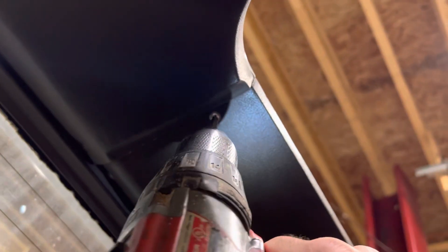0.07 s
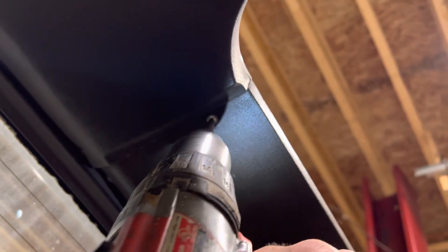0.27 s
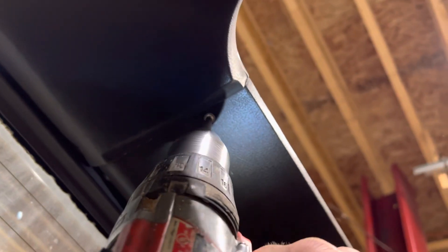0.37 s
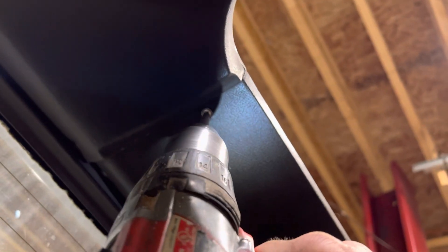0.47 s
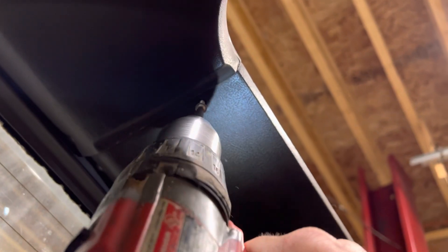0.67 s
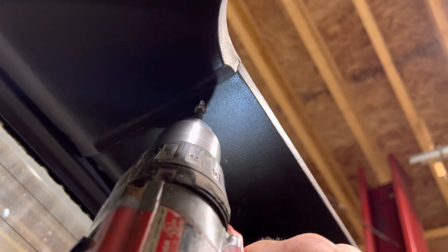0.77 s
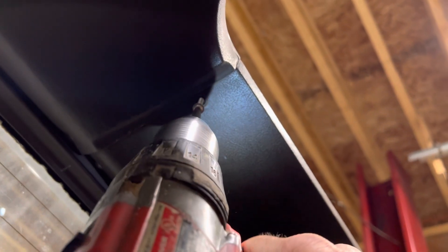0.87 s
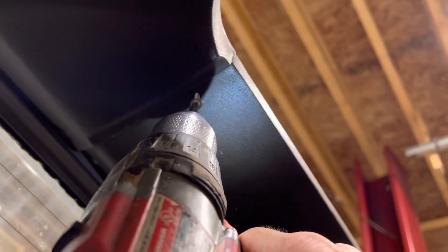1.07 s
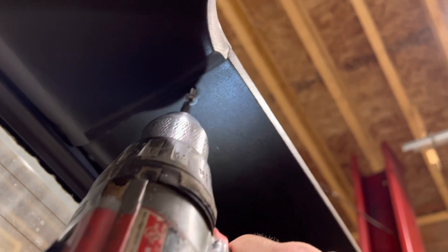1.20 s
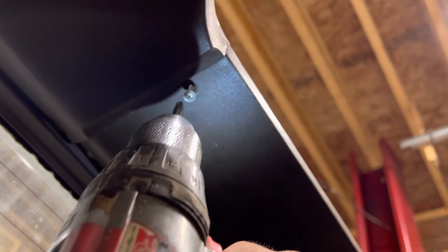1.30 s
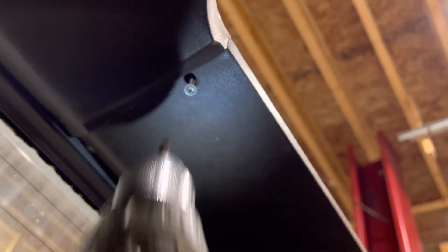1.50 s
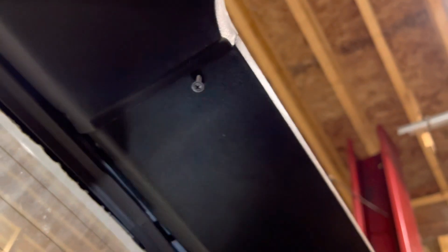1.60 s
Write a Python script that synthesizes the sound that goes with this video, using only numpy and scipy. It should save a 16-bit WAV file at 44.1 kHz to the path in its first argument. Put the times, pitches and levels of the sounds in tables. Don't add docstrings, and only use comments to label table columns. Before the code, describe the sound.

A cordless drill clicks, whines and rattles for under a second, backing a screw from metal

```python
import sys
import numpy as np
from scipy import signal
from scipy.fft import rfft, irfft
from scipy.io import wavfile
from scipy.ndimage import uniform_filter1d

SR = 44100
rng = np.random.default_rng(int(sys.argv[2]) if len(sys.argv) > 2 else 0)


def pcm_store(signal):
    levels = np.round(np.clip(np.atleast_2d(signal), -1, 1) * 32767)
    wavfile.write(sys.argv[1], SR, levels.astype(np.int16).T)


def voltage_ratio(decibels):
    exponent = np.asarray(decibels, float) / 20
    return 10 ** exponent


N = 72765
START_S, BRAKE_S, STOP_S = .193, .895, .929


def curve(table, x, col=1, log=False):
    points = np.array(table, float)
    if log:
        return np.interp(np.log(x + 1), np.log(points[:, 0] + 1), points[:, col])
    return np.interp(x, points[:, 0], points[:, col])


def unit(x):
    return x / np.sqrt(np.mean(x ** 2))


def colour(x, table):
    hz = np.fft.rfftfreq(N, 1 / SR)
    return irfft(rfft(x) * voltage_ratio(curve(table, hz, log=True)), N)


def walk(rate):
    hold = int(SR / rate)
    steps = np.repeat(rng.standard_normal(N // hold + 1), hold)
    return unit(uniform_filter1d(uniform_filter1d(steps, hold), hold)[:N])


def ring(x, modes):
    out = 0
    for hz, db, t60 in modes:
        radius = np.exp(-np.log(1000) / (t60 * SR))
        angle = 2 * np.pi * hz / SR
        poles = [1, -2 * radius * np.cos(angle), radius * radius]
        out = out + voltage_ratio(db) * np.sqrt(1 - radius) * signal.lfilter([np.sin(angle)], poles, x)
    return out


def gate(t, on, rise, off, fall):
    return np.clip((t - on) / rise, 0, 1) * np.exp(-np.maximum(t - off, 0) / fall)


# (frequency [Hz], level [dB per Hz])
AIR_TONE = [(25, -24.5), (60, 1), (110, -15), (300, -25), (1500, -29.5), (2600, -49), (5000, -55),
            (12000, -74.5)]


def air(t):
    mid = unit(colour(rng.standard_normal(N), AIR_TONE))
    side = unit(colour(rng.standard_normal(N), AIR_TONE))
    side = signal.lfilter(*signal.butter(1, 400, "high", fs=SR), side)
    level_db = -55 + 5 * (t < STOP_S) + 0.95 * walk(8)
    return voltage_ratio(level_db) * (mid + .8 * side * np.array([[1], [-1]]))


# (time [s], level [dB])
RUMBLE_LEVEL = [(0, -30.5), (.19, -34), (.25, -34), (.4, -18.5), (.67, -26.5), (.72, -32), (.8, -37),
                (1.0, -39), (1.12, -58)]
# (frequency [Hz], level [dB per Hz])
RUMBLE_TONE = [(28, -28), (50, -2.5), (66, 11.5), (100, -13), (200, -13), (350, -21.5), (800, -41),
               (2000, -95.5)]


def rumble(t):
    noise = unit(colour(rng.standard_normal(N), RUMBLE_TONE))
    level_db = curve(RUMBLE_LEVEL, t) - 3 + 1.5 * walk(20)
    return voltage_ratio(level_db) * noise * gate(t, 0, .012, 9, 1)


# (frequency [Hz], level [dB], t60 [s])
METAL = [(715, -8, .05), (1640, -8, .025), (2750, -5, .02), (4420, -7, .03), (5100, -8, .02),
         (5550, -7, .02), (5970, -7, .06), (6150, -5, .1), (6600, -7, .025), (6950, -7, .03),
         (8070, -10, .02), (8590, -9, .03)]
# (time [s], level [dB], centre frequency [Hz], length [s], metal ring level [dB])
KNOCKS = [(0.131, -46, 3000, 0.0077, -25), (0.145, -29.5, 5992, 0.0055, -44.5),
          (0.195, -21, 5500, .004, -43), (0.199, -15, 2800, 0.0045, -22), (0.207, -17, 930, 0.0044, -2.5),
          (0.211, -18, 2770, 0.019, 2.5), (0.206, -25, 329, 0.021, -9.5), (.243, -26.5, 2440, 0.024, 5),
          (.297, -18, 1310, 0.011, -20), (0.898, -17, 1007, 0.011, -1), (0.902, -18.5, 2760, 0.0031, -10),
          (0.913, -16.5, 2280, 0.0032, -9), (0.917, -9.5, 6110, 0.0017, 2),
          (0.922, -21.5, 2500, 0.0023, -4), (0.931, -29.5, 2920, 0.0013, -8.5),
          (0.94, -29.5, 721, 0.0038, -10.5), (.950, -40.5, 1500, .004, -11.5),
          (.965, -57.5, 8000, 0.0037, -14), (0.973, -30.5, 6610, 0.004, -33),
          (1.4705, -44.5, 7800, 0.0029, -30), (1.471, -58, 1503, 0.00375, -32),
          (.922, -21.5, 370, .01, -20)]


def knocks(t):
    contact_noise, push_noise = rng.standard_normal((2, N))
    spread = 1.8
    blows, push = 0, 0
    for start, db, hz, length, ring_db in KNOCKS:
        band = signal.butter(1, [hz / spread, min(hz * spread, .45 * SR)], "band", fs=SR)
        blow = voltage_ratio(db) * gate(t, start, .0004, start + .0004, length)
        blows = blows + blow * unit(signal.lfilter(*band, contact_noise))
        push = push + voltage_ratio(ring_db) * blow * unit(signal.lfilter(*band, push_noise))
    return blows + ring(push, METAL)


# (frequency [Hz], level [dB per Hz])
RATTLE_TONE = [(300, -5.5), (1000, -12.5), (2100, -18.5), (3000, -6.5), (6000, 2.5), (9000, -2.5),
               (11000, -12), (16000, -20)]
# (time [s], gear mesh frequency [Hz], rattle level [dB], load on the teeth [dB])
MOTOR = [
    (0.2, 418.5, -30, -1.5),
    (0.226, 473, -21, 0.5),
    (0.246, 550.2, -16.5, -3),
    (0.306, 664.6, -20, 1.5),
    (0.484, 765.7, -20, 0.5),
    (0.56, 865, -17, 0),
    (0.616, 887.7, -18, 1.5),
    (0.8, 943.2, -19.5, 1),
    (0.895, 848.5, -22.5, -5),
]


def rattle(t):
    planet_db = np.sin(2 * np.pi * 88.4 * t)
    force = voltage_ratio(walk(900) + planet_db + 1.1 * walk(25))
    hits = rng.standard_normal(N) * force
    impacts = unit(colour(hits, RATTLE_TONE)) + voltage_ratio(-13.5) * unit(ring(hits, METAL))
    running = gate(t, START_S, .007, STOP_S, 0.0047) * voltage_ratio(-4 * (t > BRAKE_S))
    return voltage_ratio(curve(MOTOR, t, col=2)) * running * impacts


# (multiple of mesh frequency, level [dB], flutter [dB])
MESH = [(1, -32, 2), (2, -49, 5), (3, -40, 3), (4, -30, 2)]
# (frequency [Hz], width [Hz], gain [dB])
HOUSING = [(555, 200, -11.5), (998, 400, 5.5), (1560, 620, 6), (2800, 380, 12.5), (3650, 450, 3.5)]


def whine(t):
    mesh_hz = uniform_filter1d(curve(MOTOR, t), size=2600)
    phase = 2 * np.pi * np.cumsum(mesh_hz * (1 + .002 * walk(80))) / SR
    load_db = curve(MOTOR, t, col=3)
    out = 0
    for k, db, flutter_db in MESH:
        lift_db = sum(gain / (1 + (2 * (k * mesh_hz - hz) / width) ** 2) for hz, width, gain in HOUSING)
        level = voltage_ratio(db + load_db + lift_db + flutter_db * walk(40))
        out = out + level * np.sqrt(2) * np.sin(k * phase)
    return out * gate(t, START_S, 0.096, BRAKE_S, 0.0024)


# (frequency [Hz], level [dB], t60 [s])
PANEL = [(135, -4.5, .1), (187.4, -1.5, .08), (349, -7, .1), (458.9, -5, .12), (726, -3, .25)]


def shaken_panel(t):
    free_s = .68
    modes = unit(ring(rng.standard_normal(N), PANEL))
    swell_db = 3.5 * np.exp(-((t - free_s) / 0.09) ** 2)
    return voltage_ratio(-28.5 + swell_db) * modes * gate(t, START_S, .02, free_s, .12) * (t < STOP_S)


# (time [s], level [dB], starting frequency [Hz])
JOLTS = [
    (0.229, -20, 220),
    (.284, -12.5, 340),
    (0.303, -8, 340),
    (.316, -5, 216.7),
    (0.346, -10.5, 79.55),
    (.745, -19, 233.6),
    (.765, -14, 126.3),
]


def booms(t):
    end_hz, fall_s, decay_s = 47, .024, .045
    out = 0
    for start, db, top_hz in JOLTS:
        since = np.maximum(t - start, 0)
        cycles = end_hz * since + (top_hz - end_hz) * fall_s * (1 - np.exp(-since / fall_s))
        out = out + voltage_ratio(db) * gate(t, start, .004, start + .004, decay_s) * np.sin(2 * np.pi * cycles)
    return out


def lamp(t):
    return voltage_ratio(-86.5 + 3.5 * walk(15.96)) * np.sin(2 * np.pi * 5370 * t) * gate(t, 1.45, 0.031, 9, 1)


def room(x, t):
    t60_s, treble_t60_s = .6, .28
    sides = []
    for _ in range(2):
        noise = rng.standard_normal(N)
        low = signal.lfilter(*signal.butter(1, 1500, fs=SR), noise)
        tail = low * voltage_ratio(-60 * t / t60_s) + (noise - low) * voltage_ratio(-60 * t / treble_t60_s)
        echo = tail * (t > .006) / np.sqrt(np.sum(tail ** 2))
        sides.append(signal.fftconvolve(x, echo[:SR])[:N])
    return voltage_ratio(-25) * np.array(sides)


# (frequency [Hz], left minus right [dB])
LEFT_OVER_RIGHT = [(60, 1.0), (110, 1.5), (200, 2.5), (380, 2.0), (700, 3.5), (1290, 7.0), (2380, 2.5),
                   (4400, 8.5), (8120, 6.0), (15000, 0.0)]
# (frequency [Hz], side minus mid [dB])
SIDE_OVER_MID = [(60, -15), (110, -12), (200, -7), (380, -8), (700, -6), (1290, -1), (2380, -5), (4400, -2),
                 (8120, -3), (15000, -5)]


def ports(x):
    hz = np.fft.rfftfreq(N, 1 / SR)
    side_ratio = voltage_ratio(curve(SIDE_OVER_MID, hz, log=True))
    power_ratio = voltage_ratio(2 * curve(LEFT_OVER_RIGHT, hz, log=True))
    in_step = (power_ratio - 1) * (1 + side_ratio ** 2) / (2 * side_ratio * (power_ratio + 1))
    in_step = np.clip(in_step, -1, 1)
    smear = rfft(rng.standard_normal(2000) * np.exp(-np.arange(2000) / 450), N)
    smear = smear / np.sqrt(np.mean(abs(smear) ** 2))
    scatter = .65
    rest = -1j * np.sqrt(1 - scatter) + np.sqrt(scatter) * smear
    side = irfft(rfft(x) * side_ratio * (in_step + np.sqrt(1 - in_step ** 2) * rest), N)
    return np.array([x + side, x - side])


def scene():
    t = np.arange(N) / SR
    background = air(t) + lamp(t)
    clatter = knocks(t) + rattle(t)
    tone = whine(t)
    panel = rumble(t) + shaken_panel(t) + booms(t)
    return ports(tone + clatter + panel) + room(.4 * tone + clatter, t) + background


def band_limit(x):
    return signal.sosfilt(signal.butter(12, 16100, fs=SR, output="sos"), x)


# (frequency [Hz], level [dB])
FINAL_TONE = [(25, -12), (45, 0), (9300, -1), (10100, -20), (11300, 3), (13600, -9), (15500, 1), (16500, -32.5)]


def record(dry):
    heard = np.array([colour(channel, FINAL_TONE) for channel in dry])
    return band_limit(np.tanh(.9 * heard) / .9)


dry = scene()
out = record(dry)
pcm_store(out)
```